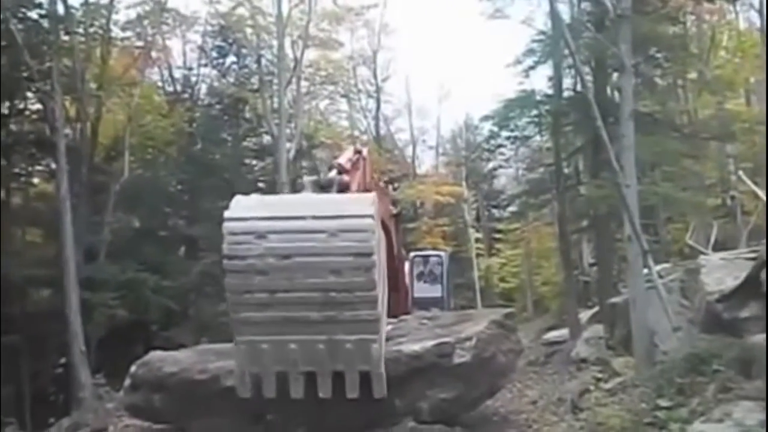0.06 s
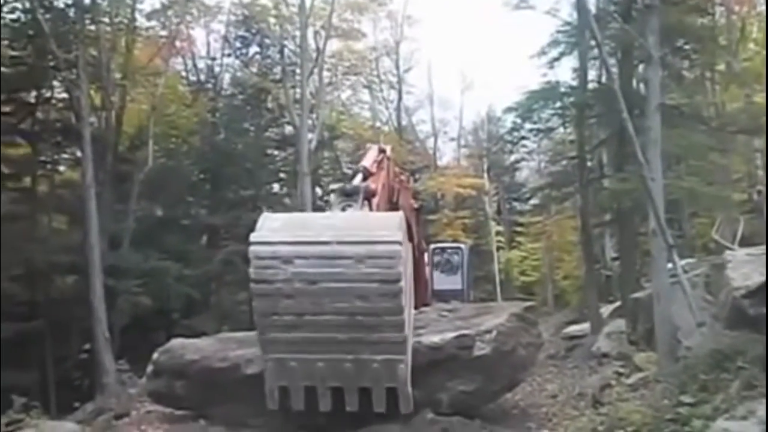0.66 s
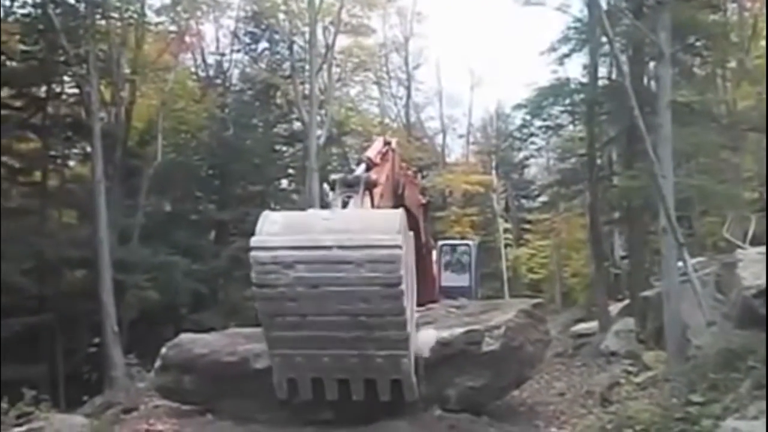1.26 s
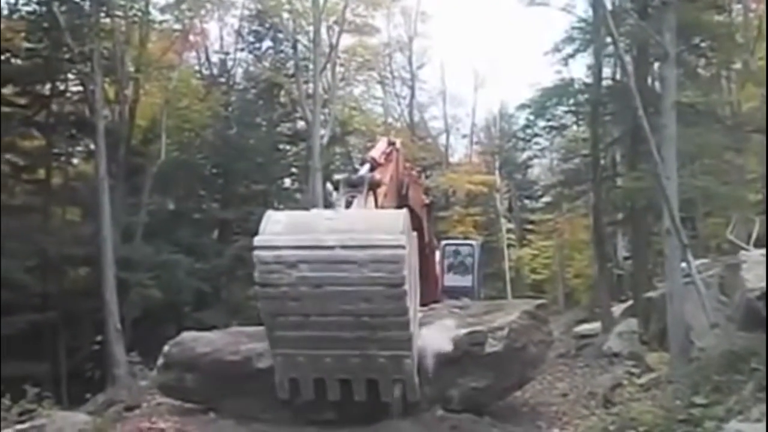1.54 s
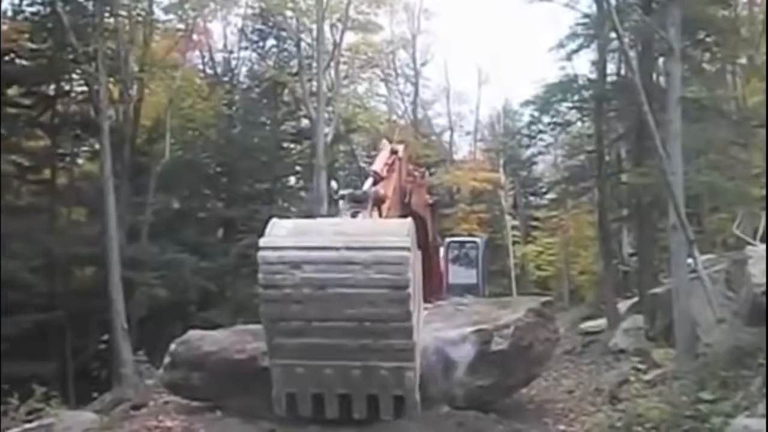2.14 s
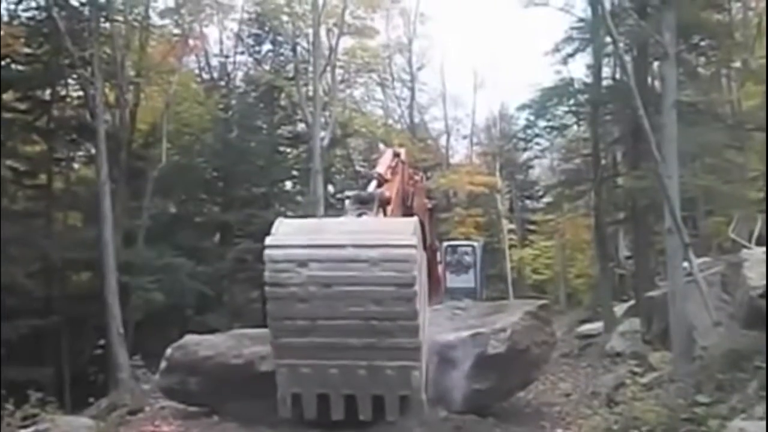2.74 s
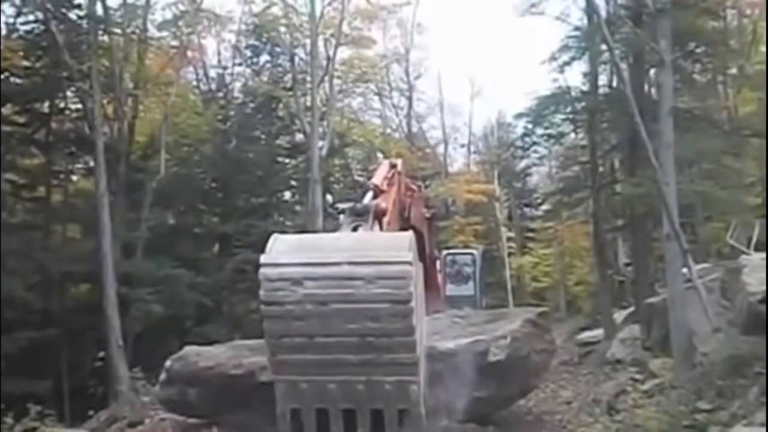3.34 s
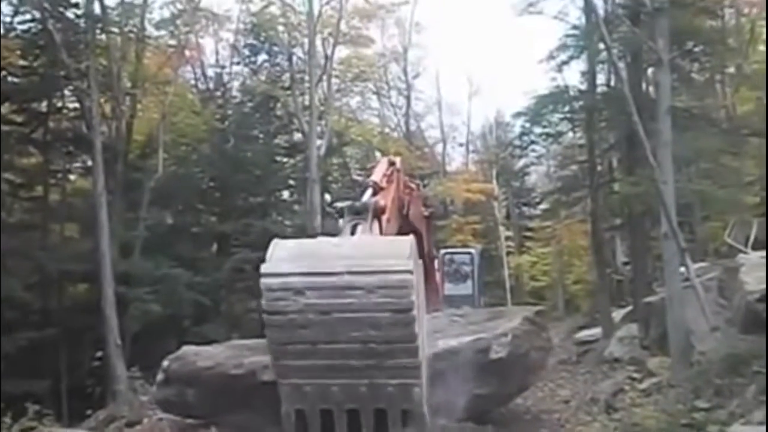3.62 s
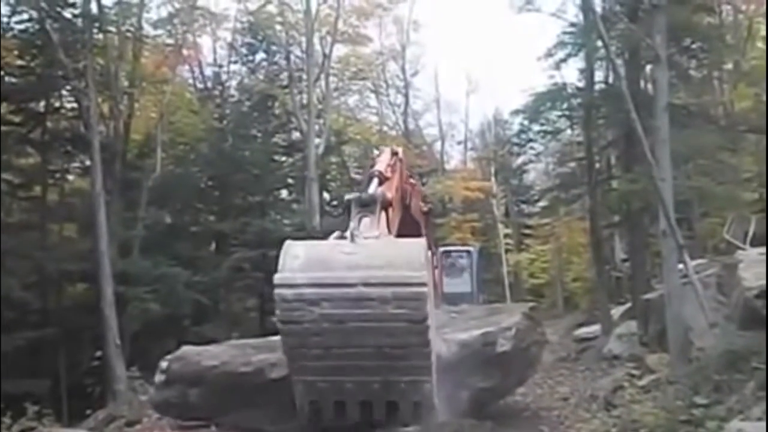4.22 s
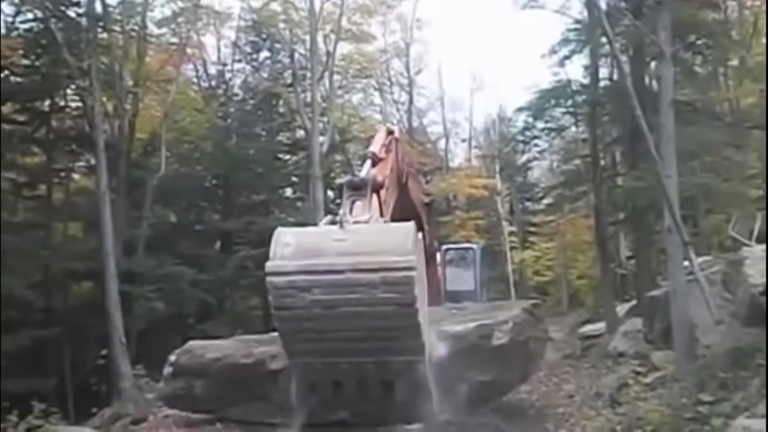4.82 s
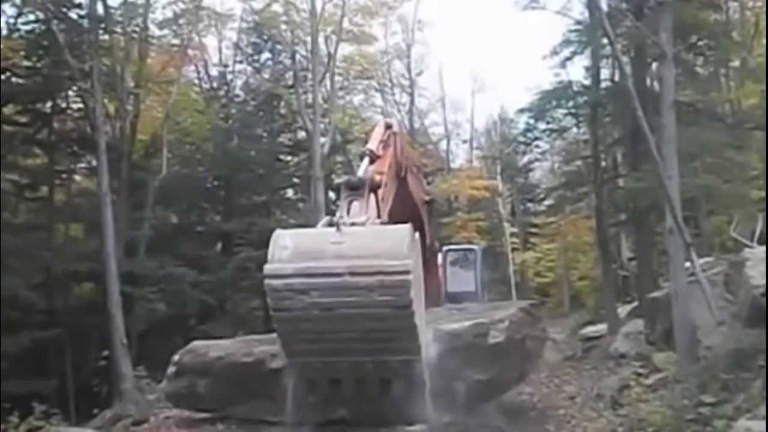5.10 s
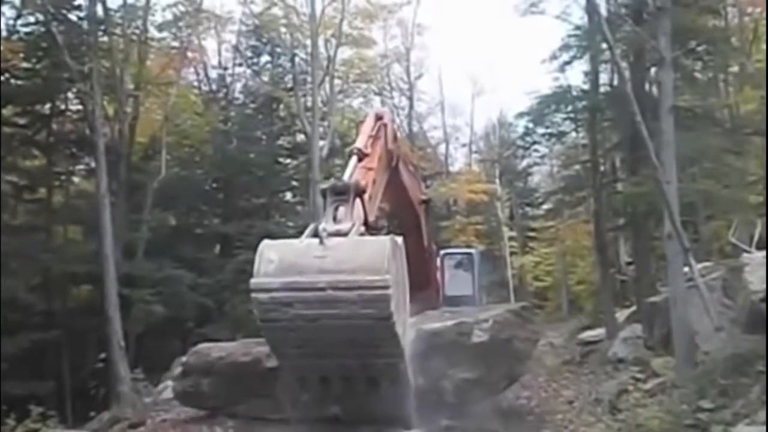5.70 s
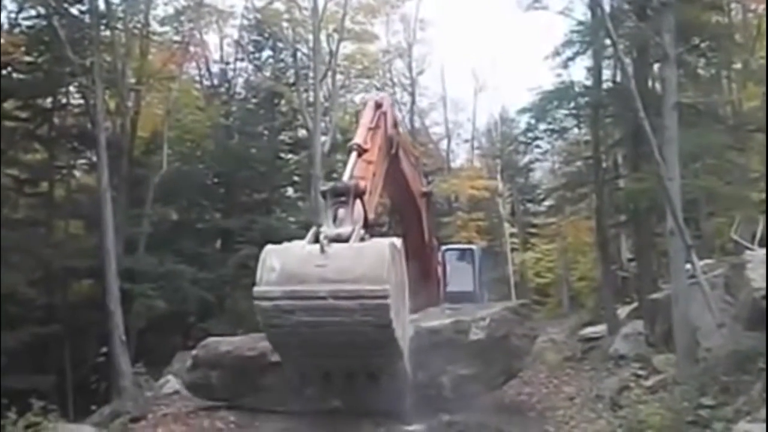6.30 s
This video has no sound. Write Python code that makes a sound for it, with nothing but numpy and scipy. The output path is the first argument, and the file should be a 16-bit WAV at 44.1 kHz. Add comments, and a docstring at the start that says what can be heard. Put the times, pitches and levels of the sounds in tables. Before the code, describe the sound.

An excavator's diesel engine throbs throughout, straight ahead of the microphone in a forest clearing, with a steady high hydraulic hiss. Its steel bucket pushes a boulder over rocky ground, at first with light scrapes and squeaks. From about 0.9 to 1.7 seconds comes a loud, juddering grind with low booms, metallic clanks and bright snaps of stone. A second heavy shove runs from 2 to 2.8 seconds with short squeals and thuds, while the engine sags and grows louder. Lighter scraping follows, with a jolt at 3.6 seconds and a hard ringing blow and thud at 4.5. The grinding then stops; from 4.7 seconds a wavering, buzzing pump whine joins the labouring engine until the end, just past 6 seconds, with one soft knock at 5.8. The trees echo faintly, and the overall level ducks briefly after heavy blows and swells back.

```python
"""Excavator shoving a boulder

A forest clearing, the machine straight ahead of a camera's microphone. Its six-cylinder diesel sags
and grows louder under load; oil hisses through the valves and, near the end, the piston pump whines.
The boulder slides over rocky ground in fits, jolts and thuds, ringing the steel bucket and spitting
chips; the trees answer faintly. The camera's gain control ducks after heavy blows and swells back."""
import sys
import numpy as np
from scipy import signal
from scipy.fft import rfft, irfft, next_fast_len
from scipy.io import wavfile
from scipy.ndimage import uniform_filter1d, minimum_filter1d, map_coordinates

SR = 44100
rng = np.random.default_rng(int(sys.argv[2]) if len(sys.argv) > 2 else 0)


def wav_record(signal):
    """Record a signal, one row per channel, as 16-bit PCM in the file named by sys.argv[1]."""
    frames = np.transpose(np.atleast_2d(signal))
    bounded = np.clip(frames, -1, 1)
    # unit amplitude maps onto the largest positive 16-bit level
    quanta = np.round(bounded * 32767).astype(np.int16)
    wavfile.write(sys.argv[1], SR, quanta)


N = 280476

# engine speed, sagging under load: (time [s], firing rate [Hz])
ENGINE_SPEED = [(0, 92), (1.8, 91.5), (2.2, 89), (2.6, 83), (3.2, 91), (4.0, 90), (4.8, 83), (5.0, 83.5),
                (5.2, 82.3), (5.45, 86.4), (5.75, 86.3), (6.05, 82.6), (6.36, 82.6)]
# resonances of the steel bucket: (frequency [Hz], width [Hz], level [dB])
BUCKET_MODES = [(417.3, 46, -4.5), (522, 24, -8), (724.7, 21, -1.5), (793, 73, -6.5), (1024, 170, -9),
                (1119, 17, -5.5), (1630, 14, -12), (1804, 40, -16.5), (2470, 68, -22), (2995, 230, -12.5),
                (3208, 66, -13.5)]
# spectrum of the boulder's low groan: (frequency [Hz], level [dB])
GROAN_SPECTRUM = [(60, -21), (105, 2.5), (125, -1.5), (200, 1), (250, -0.5), (350, -44.5), (600, -59),
                  (9000, -120)]


def amp(db):
    """Decibels to gain."""
    return 10 ** (np.asarray(db) / 20)


def unit(x):
    """x scaled to rms 1."""
    return x / np.sqrt(np.mean(x ** 2) + 1e-20)


def along(points, hz):
    """Interpolate (Hz, value) points on a log frequency axis."""
    freqs, values = np.transpose(points)
    return np.interp(np.log(hz + 1), np.log(freqs + 1), values)


def curves(rows):
    """One value per sample for each column after the time."""
    times, *columns = np.transpose(rows)
    return [np.interp(np.arange(N) / SR, times, column) for column in columns]


def swells(rows):
    """Bell-shaped swells from (time [s], height, half width [s]) rows."""
    return sum(height * np.exp(-((np.arange(N) / SR - s) / width) ** 2) for s, height, width in rows)


def wobble(rate):
    """A smooth random curve, rate knots a second."""
    return map_coordinates(rng.standard_normal(int(N * rate / SR) + 4), [np.arange(N) * rate / SR])


def filtered(x, response):
    """x through a complex frequency response."""
    n = x.shape[-1]
    padded = next_fast_len(n + 8192)
    return irfft(rfft(x, padded) * response(np.fft.rfftfreq(padded, 1 / SR)), padded)[..., :n]


def coloured(x, spectrum):
    """x shaped by (Hz, dB) points, at rms 1."""
    return unit(filtered(x, lambda hz: amp(along(spectrum, hz))))


def modes(table, f):
    """Causal response of (frequency [Hz], width [Hz], level [dB]) resonances."""
    return sum(amp(db) * 1j * f * width / (hz * hz - f * f + 1j * f * width) for hz, width, db in table)


def lagged(x, seconds):
    """x smoothed with a time constant."""
    keep = np.exp(-1 / (seconds * SR))
    return signal.lfilter([1 - keep], [1, -keep], x)


def add(track, start, sound):
    """Mix a sound into a track at start seconds."""
    part = track[max(round(start * SR), 0):][:len(sound)]
    part += sound[:len(part)]


def firing_phase():
    """The phase that turns once per cylinder firing."""
    return 2 * np.pi * np.cumsum(curves(ENGINE_SPEED)[0]) / SR


def diesel(free_hz=92, exhaust_db=-27, roar_db=-23, throb=0.13, limp=0.026):
    """An exhaust tone and a roar that throbs with each firing, both louder as load slows the engine."""
    # weaker exhaust tones: (multiple of the firing rate, level against the main tone [dB])
    orders = [(.5, -21), (1.5, -13), (2, -15), (4, -20)]
    # engine roar: (frequency [Hz], level [dB])
    roar_spectrum = [(20, -12), (35, 2.5), (65, -5), (120, 3), (165, 0.5), (210, -6.5), (340, -5),
                     (520, -6.5), (630, -12), (780, -8), (1100, -16), (2000, -20), (4200, -36), (7000, -69),
                     (9000, -99)]
    sag_hz = free_hz - curves(ENGINE_SPEED)[0]
    phase = firing_phase()
    weaker_tones = sum(amp(db + 3.3 * wobble(7.1)) * np.sin(k * phase) for k, db in orders)
    exhaust = amp(exhaust_db + 0.7156 * sag_hz + 0.16 * wobble(11)) * unit(np.sin(phase) + weaker_tones)
    # three firings to a turn of the shaft; unequal cylinders make each turn limp
    beat = 1 + throb * np.cos(phase) + limp * np.cos(phase / 3)
    roar = amp(roar_db + 0.0972 * sag_hz) * coloured(beat * rng.standard_normal(N), roar_spectrum)
    return exhaust + roar


def oil_hiss(level_db=-35.5):
    """Oil hisses through the valves; part comes back from the trees, different on each side."""
    # valve hiss: (frequency [Hz], level [dB])
    spectrum = [(1200, -20), (3000, -2.5), (3700, -3.5), (4300, -5.5), (5300, -1.5), (6100, 0),
                (7000, -2.8), (7400, -14), (7700, -38), (8100, -70)]
    # brief surges of the oil: (time [s], rise [dB], half width [s])
    surges = [(.28, 3, 0.058), (4.0, 4.5, 0.03)]
    flow = rng.standard_normal(N) + 0.27 * rng.standard_normal((2, N))
    return amp(level_db + swells(surges)) * coloured(flow, spectrum)


def sliding(attack_s=0.018, release_s=0.064):
    """Strength of scrape, crunch, grit and groan: each slide starts quickly, holds and dies away."""
    # the boulder's slides: (time [s], length [s], scrape [dB], crunch [dB], grit [dB], groan [dB])
    slides = [(0.1, 0.24, -30.5, -56, -46, -45), (0.545, 0.36, -30, -30, -45, -26),
              (0.933, 0.22, -23, -22, -37, -18.5), (1.138, 0.21, -14.5, -15.5, -31.5, -13.5),
              (1.337, 0.18, -21.5, -11.5, -37, -15.5), (1.514, 0.23, -31, -28, -43, -32),
              (2.01, 0.17, -19.5, -16, -30.5, -21.5), (2.176, 0.16, -15.5, -14.5, -23, -16),
              (2.327, 0.14, -16, -16.5, -27, -19.5), (2.495, 0.08, -16.5, -20, -26.5, -18.5),
              (2.625, 0.16, -21.5, -21.5, -30.5, -22.5), (2.841, 0.022, -19, -23.5, -44.5, -23),
              (2.923, 0.11, -21.5, -30.5, -33, -28), (3.055, 0.16, -21.5, -29.5, -31.5, -29.5),
              (3.247, 0.087, -23.5, -21.5, -37, -24), (3.484, 0.16, -32.5, -24.5, -46, -30),
              (3.606, 0.061, -11, -15.5, -28.5, -14.5), (3.72, 0.078, -33.5, -37, -52.5, -34),
              (3.926, 0.35, -31, -34, -50, -31.5), (4.304, 0.15, -25, -23.5, -34, -23),
              (4.479, .035, -19, -17, -32, -27), (4.55, 0.055, -21, -14.5, -25.5, -24)]
    strengths, t = np.zeros((4, N)), np.arange(SR) / SR
    for start, length, *levels_db in slides:
        envelope = (1 - np.exp(-t / attack_s)) * np.exp(-np.maximum(t - length, 0) / release_s)
        for track, db in zip(strengths, levels_db):
            add(track, start, amp(db) * envelope)
    return strengths


def slips(per_second=1000, spread_db=1.5):
    """Tiny stick-slip impulses of unequal size on a bed of fine grit."""
    kicks = (rng.random(N) < per_second / SR) * rng.choice([-1, 1], N)
    sizes = amp(-spread_db * np.clip(rng.standard_normal(N), -2, 2))
    return unit(kicks * sizes) + rng.standard_normal(N)


def bucket(contact, direct=0.3):
    """Contact noise reaches the microphone directly and through the ringing plates."""
    return filtered(contact, lambda f: direct + modes(BUCKET_MODES, f))


def grinding(scrape, crunch, grit, judder_db=2.5):
    """Stone crushes stone in a juddering stream of slips that rings the bucket."""
    # midrange scrape, low crunch and bright grit, each (frequency [Hz], level [dB])
    scrape_spectrum = [(350, -13.5), (650, 0), (900, 1.5), (1200, -8), (1500, -18.5), (2100, -25),
                       (3200, -26), (6000, -34.5), (8500, -92)]
    crunch_spectrum = [(130, -54), (250, 6.5), (400, 3.5), (540, 4.5), (700, -8.5), (1300, -60.5),
                       (9000, -110)]
    grit_spectrum = [(900, -34), (1400, 0), (1900, -0.5), (3000, -20), (6000, -31.5), (9000, -98)]
    contact = bucket(slips() * amp(judder_db * wobble(80)))
    return (amp(-1) * scrape * coloured(contact, scrape_spectrum)
            + amp(-1) * crunch * coloured(contact, crunch_spectrum)
            + amp(-2) * grit * coloured(contact, grit_spectrum))


def rumbling(groan, lurch_db=-4, drag_db=-9, groan_db=3):
    """The dragged weight shakes the soil, most at each lurch, and sets bucket and arm groaning."""
    # the weight settles into the soil: (time [s], relative level [dB])
    lurches = [(.59, -16), (1.129, -13), (1.251, -21), (2.06, -15), (2.35, -24), (2.44, -9.5),
               (3.129, -17.5), (3.25, -19), (3.58, -20.5), (4.0, -24), (4.14, -24), (4.319, -13),
               (4.511, -16)]
    # ground rumble: (frequency [Hz], level [dB])
    soil_spectrum = [(15, -27), (30, -6), (43, 8.5), (60, 2), (100, -21.5), (250, -59.5), (9000, -120)]
    # lowest modes of bucket and arm: (frequency [Hz], width [Hz], level [dB])
    arm_modes = [(121.4, 1.8, 9.5), (137, 68, -6.5), (185.3, 10, -2.5), (208.8, 18, -7)]
    shake = amp(drag_db) * groan + swells([(s, amp(db + lurch_db), 0.068) for s, db in lurches])
    ringing = filtered(rng.standard_normal(N), lambda f: modes(arm_modes, f))
    soil = shake * coloured(rng.standard_normal(N), soil_spectrum)
    return soil + amp(groan_db) * groan * coloured(ringing, GROAN_SPECTRUM)


def squeals(octave_db=-19):
    """Steel teeth stick and slip on stone fast enough to give a rough, gliding pitch."""
    # skids: (time [s], level [dB], pitch [Hz], length [s], glide [octaves/s], roughness [0-1])
    skids = [(0.137, -32, 1350, 0.057, 1, .12), (.268, -23, 820, .035, -1.5, 0.02),
             (.622, -24, 1120, 0.023, -2.5, 0.01), (0.628, -18.5, 745, .045, 0.5, 0.09),
             (.92, -12, 348, 0.035, -10, 0.24), (0.921, -19, 1553, 0.03, -10.5, 0.11),
             (1.029, -16, 253.6, 0.047, 8, .3), (1.169, -3, 775, 0.022, -6.5, 0),
             (1.595, -22, 1080, 0.018, -11, 0.04), (2.103, -10, 740, 0.047, 0, 0.04),
             (2.184, -6, 499, 0.033, -5.5, 0.06), (2.199, -4.5, 247, 0.025, -5, .08),
             (2.241, -9.5, 728, 0.092, 0.5, 0.05), (2.333, -16, 262.7, 0.14, 0, .22),
             (2.371, -9, 774, 0.061, -1.5, 0.02), (2.637, -6, 900, 0.027, -1.5, 0),
             (2.642, -9.5, 1092, .03, 0, 0.03), (2.918, -12.5, 403, 0.039, -17, 0.31),
             (2.944, -14.5, 1380, 0.018, -5.5, 0.03), (3.14, -13, 784, 0.021, -2.5, 0.08),
             (3.156, -17, 1068, 0.068, 0, 0.08), (3.21, -12.5, 779, .06, -0.5, 0.07),
             (3.286, -19.5, 1107, 0.037, 1, 0.05), (3.457, -13.5, 502.6, 0.06, -2.5, 0.15),
             (3.645, -5, 825, 0.04, -0.5, 0.06), (4.505, -7.5, 838, 0.032, 4, 0.17)]
    track, t = np.zeros(N), np.arange(SR // 5) / SR
    for start, db, hz, length, glide, roughness in skids:
        waver, grip = unit(uniform_filter1d(rng.standard_normal((2, len(t))), size=70))
        pitch_hz = hz * 2 ** (glide * t) * (1 + roughness * waver)
        phase = 2 * np.pi * np.cumsum(pitch_hz) / SR
        tone = np.sin(phase) + amp(octave_db) * np.sin(2 * phase)
        envelope = (1 - np.exp(-t / 0.004)) * np.exp(-(t / length) ** 4)
        chatter = 1 + 0.4 * lagged(grip, 0.0005)
        add(track, start, amp(db) * envelope * chatter * tone)
    return track


def jolts(rise_share=0.025):
    """The rock catches and lets go: short bursts of fracture, dull or sharp, into the bucket."""
    # fractures: (time [s], relative level [dB], low knock [dB], high crack [dB], t60 [s])
    fractures = [(.264, -13, 4, -41, 0.21), (0.623, -7.5, 3, -39.5, 0.17), (.921, 1, 15.5, -11, 0.06),
                 (1.04, -4, 8, -27, .04), (1.056, 2, 8, -21, 0.053), (1.068, 4.5, -2, -24, 0.15),
                 (1.17, -2, -15, -18, 0.06), (1.239, 7, 7, -17, 0.031), (1.257, 7, -1, -20, 0.094),
                 (1.304, 10, 3, -18.5, 0.12), (1.442, 6.5, 3, -51, 0.17), (1.598, -8, -20, -48, 0.048),
                 (1.671, -6, -18, -27.5, 0.058), (2.008, 3.5, -2.5, -22, 0.059),
                 (2.19, -3, 12.5, -10, 0.047), (2.207, 4.5, 9, -10, 0.058), (2.366, 0, 0, -5.5, 0.15),
                 (2.392, 3, -4, -14, 0.12), (2.414, 4, 8, -10, 0.11), (2.49, 10, -36, -15.5, 0.059),
                 (2.642, 0.5, -27, -25, 0.09), (2.697, -1, -17, -16.5, 0.11), (2.851, -6.5, -7, -11, 0.028),
                 (2.951, -8, -8, -10, 0.036), (2.997, -1.5, -11, -24, 0.043),
                 (3.136, -2.5, -11.5, -22, 0.05), (3.451, -2, 3.5, -26, 0.12), (3.621, -1, 6.5, -26, 0.051),
                 (3.642, 3, 0, -28, 0.037), (3.682, 2.5, -9, -22, 0.032), (4.101, -9, 18.5, -25, 0.22),
                 (4.302, -8, 3.5, -27, 0.03), (4.337, -3, 3.5, -24, 0.08), (4.5, 10, -5, -28, 0.083),
                 (4.513, 0, 0, -19, 0.046), (4.546, 16.5, 4, -19, 0.034), (4.558, 2.5, 10, -14, 0.15),
                 (5.784, -4, 11.5, -37, 0.15)]
    track, t = np.zeros(N), np.arange(SR // 3) / SR
    for start, db, knock, crack, t60 in fractures:
        # the shortest jolts start hardest
        envelope = (1 - np.exp(-t / (rise_share * t60))) * amp(-60 * t / t60)
        spectrum = [(120, knock - 15), (350, knock + 5), (680, -1.5), (1150, -4.0),
                    (1800, crack + 5), (3300, crack - 5), (7000, crack - 25), (9000, -100)]
        burst = coloured(rng.standard_normal(len(t)), spectrum)
        add(track, start - 0.001, amp(db - 1) * envelope * burst)
    return bucket(track)


def thuds(dirt=0.19):
    """The boulder drops: a low boom of the bucket with a puff of crushed soil."""
    # drops: (time [s], level [dB], pitch [Hz], t60 [s], attack [s])
    drops = [(.574, 1, 88, 0.041, 0.0018), (0.782, -10, 182.4, 0.23, .01), (1.187, 7.5, 129, 0.21, 0.016),
             (1.241, 0.5, 118.5, 0.48, 0.0058), (1.367, 2, 121.7, 0.42, .01),
             (1.418, 6.5, 117.3, 0.86, 0.0088), (1.43, 1.5, 214.5, 0.13, .005),
             (2.184, 4, 118.4, 0.16, 0.017), (2.415, 8, 125, 0.17, 0.0093),
             (2.441, 8.5, 201.4, 0.19, 0.012), (2.751, -14, 198, 0.19, 0.0086), (3.598, 3, 145, 0.14, .012),
             (3.967, -7, 122, 0.24, .01), (4.521, 16, 126, 0.066, 0.01), (4.552, 0, 116, 0.76, 0.019),
             (5.777, -7, 124, 0.11, 0.0084)]
    track, t = np.zeros(N), np.arange(SR // 2) / SR
    for start, db, hz, t60, attack in drops:
        boom = np.sin(2 * np.pi * hz * t) + dirt * coloured(rng.standard_normal(len(t)), GROAN_SPECTRUM)
        add(track, start, amp(db - 60 * t / t60) * (1 - np.exp(-t / attack)) * boom)
    return track


def clanks(attack_s=0.0023):
    """A tooth strikes bare stone: the bucket rings, most in the modes that suit the contact's hardness."""
    # strikes: (time [s], level [dB], centre of the ring [Hz], spread [octaves])
    strikes = [(1.072, -7, 1200, 0.74), (1.171, 0.5, 790, 0.35), (1.245, -9.5, 3100, 0.46),
               (1.305, -14, 1650, .2), (1.328, -2.5, 2390, 0.51), (1.672, -10, 1090, .6),
               (2.011, -4, 990, 0.46), (2.488, -1, 1310, .5), (3.452, -14, 1200, 0.36),
               (3.607, -15, 3120, 0.45), (4.504, 3, 720, .45), (4.512, -2, 3320, .4), (4.548, 1, 1300, 1)]
    track, t = np.zeros(N), np.arange(SR // 3) / SR
    for start, db, centre_hz, spread in strikes:
        ring = np.zeros(len(t))
        for hz, width, mode_db in BUCKET_MODES:
            strength = amp(mode_db) * np.sqrt(width) * np.exp(-(np.log2(hz / centre_hz) / spread) ** 2)
            ring += strength * np.exp(-np.pi * width * t) * np.sin(2 * np.pi * (hz * t + rng.random()))
        add(track, start, amp(db) * (1 - np.exp(-t / attack_s)) * ring / np.abs(ring).max())
    return track


def chips(tick_t60=0.006, spray_t60=0.04):
    """A flake of stone snaps off with a bright tick and a little spray of grit."""
    # snaps: (time [s], level [dB])
    snaps = [(1.139, -8), (1.255, 3), (1.307, -2), (1.32, 14), (1.336, 12), (1.351, -8), (1.39, -5),
             (2.0911, 11.5), (2.103, 6.5), (3.6079, -0.5), (4.316, 0.5), (4.339, 0), (4.423, -7),
             (4.435, -4), (4.51, 0), (4.853, -1)]
    # a snap's bright noise: (frequency [Hz], level [dB])
    spectrum = [(1500, -30), (2800, -22), (3800, -21), (4800, -7), (5500, 0), (6500, -1), (7500, -2)]
    track, t = np.zeros(N), np.arange(SR // 10) / SR
    rise = (1 - np.exp(-t / 0.0003)) ** 2
    envelope = rise * (amp(-60 * t / tick_t60) + amp(-21 - 60 * t / spray_t60))
    for start, db in snaps:
        add(track, start, amp(db) * envelope * coloured(rng.standard_normal(len(t)), spectrum))
    return track


def pump(engage_s=0.027):
    """Nine pistons, three strokes per firing, ripple the oil: a buzzing whine with wavering overtones."""
    # the pump under full load: (time [s], fundamental [dB], octave [dB], gain of the overtones [dB])
    levels = [(4.7, -47, -32, -3), (4.85, -33.5, -38, 7), (4.98, -21.5, -42, 9.5), (5.17, -30.5, -31.5, -1),
              (5.32, -22.5, -29.5, 3), (5.7, -37.5, -29.5, 3.5), (5.9, -37.5, -34.5, 3.5),
              (6.1, -29.5, -26.5, -2), (6.36, -25.5, -24.5, 0)]
    # upper overtones: (multiple of the stroke rate, level [dB])
    overtones = [(3, -41), (5, -52.5), (6, -47.5), (7, -57), (10, -58.5)]
    fundamental_db, octave_db, whine_db = curves(levels)
    engaged = np.clip((np.arange(N) / SR - levels[0][0]) / engage_s, 0, 1)
    phase = 3 * firing_phase() + 0.045 * wobble(25)
    buzz = amp(fundamental_db) * np.sin(phase) + amp(octave_db + 1.2 * wobble(9)) * np.sin(2 * phase)
    whine = sum(amp(db + whine_db + 2 * wobble(5)) * np.sin(k * phase) for k, db in overtones)
    return np.sqrt(2) * engaged * (buzz + whine)


def trees(x):
    """Trunks round the clearing scatter back a diffuse tail, 20 ms late, that loses its treble first."""
    # the forest's decay: (frequency [Hz], t60 [s])
    decay = [(100, 0.58), (1000, 0.69), (6000, .18)]
    hz, t, noise = signal.stft(rng.standard_normal(SR // 2), SR, nperseg=256)
    tail = signal.istft(noise * amp(-60 * t / along(decay, hz)[:, None]), SR, nperseg=256)[1]
    return signal.fftconvolve(np.pad(x, (SR // 50, 0)), tail / np.linalg.norm(tail))[:N]


def scene(trees_db=-21):
    """Machine and boulder straight ahead of the microphone, nearly alike in both channels."""
    scrape, crunch, grit, groan = sliding()
    blows = jolts() + clanks() + squeals()
    rock = grinding(scrape, crunch, grit) + rumbling(groan) + thuds() + chips() + blows
    echo = amp(trees_db) * trees(blows)
    return diesel() + oil_hiss() + pump() + rock + echo


def gain_control(x, limit_db=-10, depth=1.062, sense_s=0.0057, duck_s=0.016,
                 hold_s=0.087, recover_db_per_s=51.5):
    """Sound over the limit pulls the gain down by depth dB per dB; it holds, then climbs steadily back."""
    level_db = 10 * np.log10(lagged(np.mean(x ** 2, axis=0), sense_s) + 1e-12)
    needed_db = depth * np.minimum(limit_db - level_db, 0)
    hold = round(hold_s * SR)
    held_db = minimum_filter1d(needed_db, hold, origin=(hold - 1) // 2)
    climb_db = recover_db_per_s * np.arange(N) / SR
    gain_db = np.minimum.accumulate(held_db - climb_db) + climb_db
    return x * amp(lagged(gain_db, duck_s))


def record(dry, ceiling=0.98, top_hz=14879, left_lag_s=2.8 / SR):
    """The camera rides its gain, rounds off peaks and loses the top treble; its left channel lags."""
    # the camera's treble roll-off: (frequency [Hz], level [dB])
    roll_off = [(7500, 0), (8000, -2), (8500, -10), (9500, -35), (11500, -38), (13000, -62)]
    ducked = gain_control(dry)
    rounded = ducked / (1 + np.abs(ducked / ceiling) ** 16) ** (1 / 16)
    delays = np.array([[0.5], [-0.5]]) * left_lag_s
    return filtered(rounded, lambda hz: (hz < top_hz) * amp(along(roll_off, hz))
                    * np.exp(-2j * np.pi * hz * delays))


dry = scene()
out = record(dry)
wav_record(out)
```